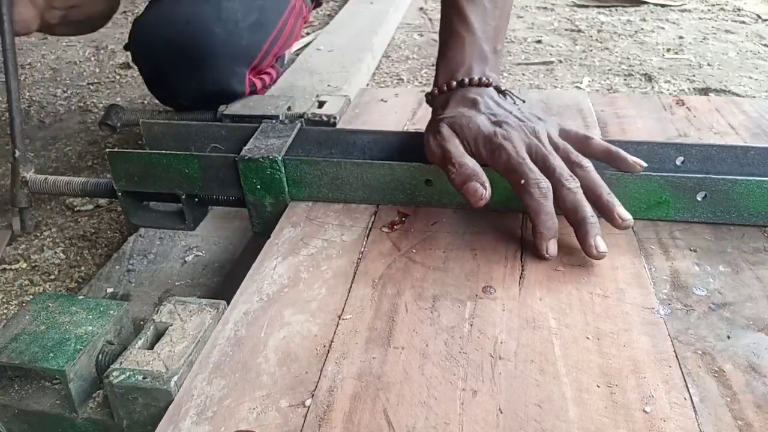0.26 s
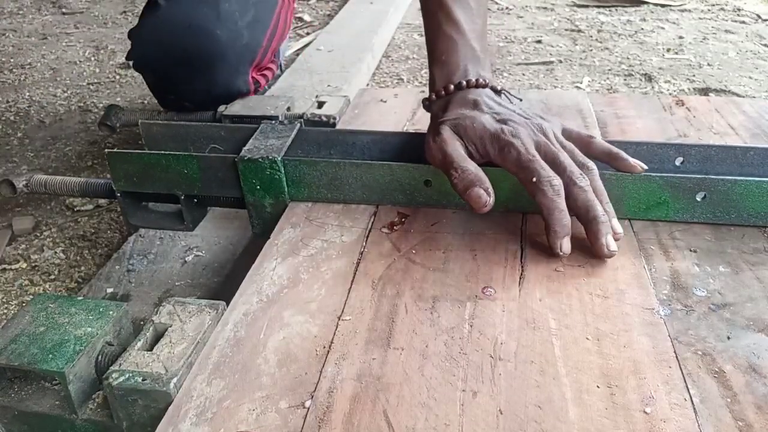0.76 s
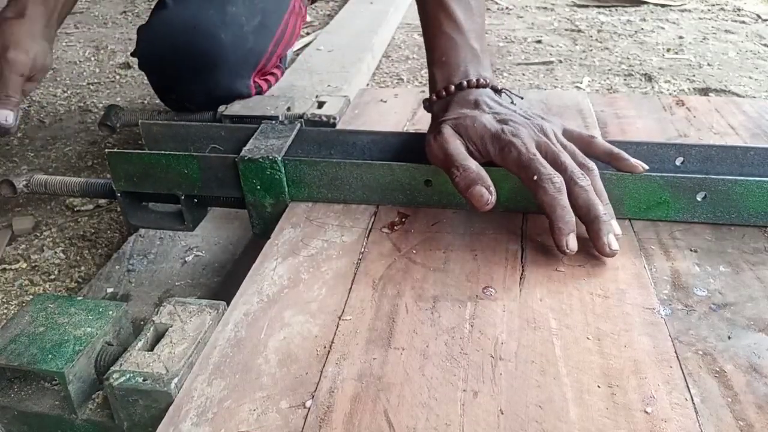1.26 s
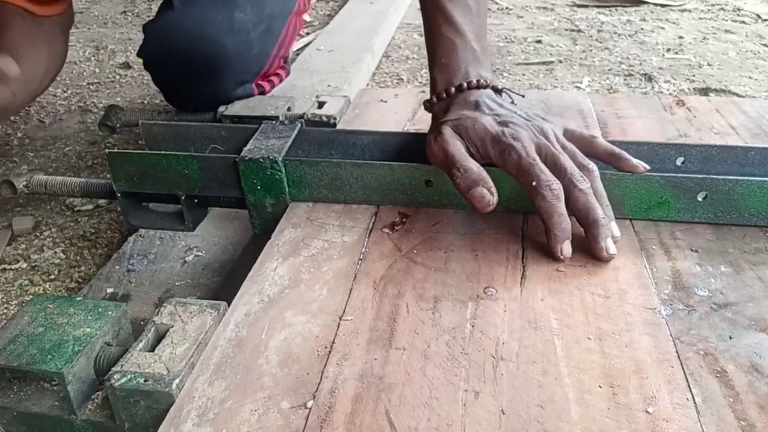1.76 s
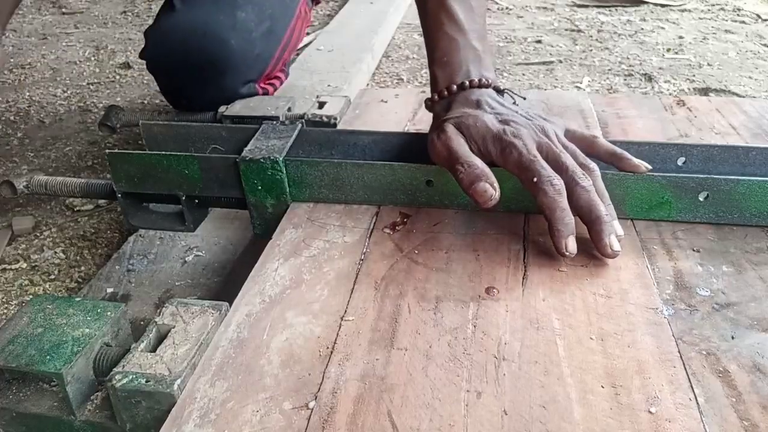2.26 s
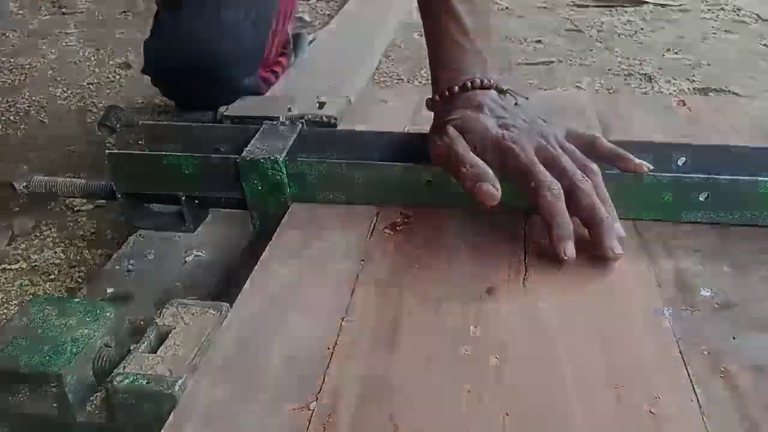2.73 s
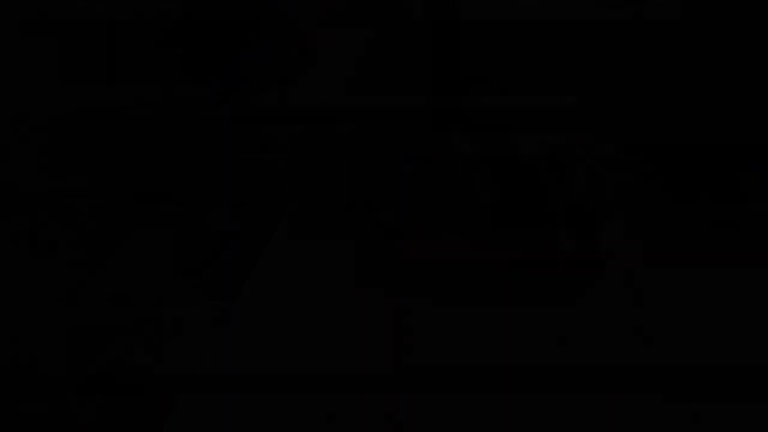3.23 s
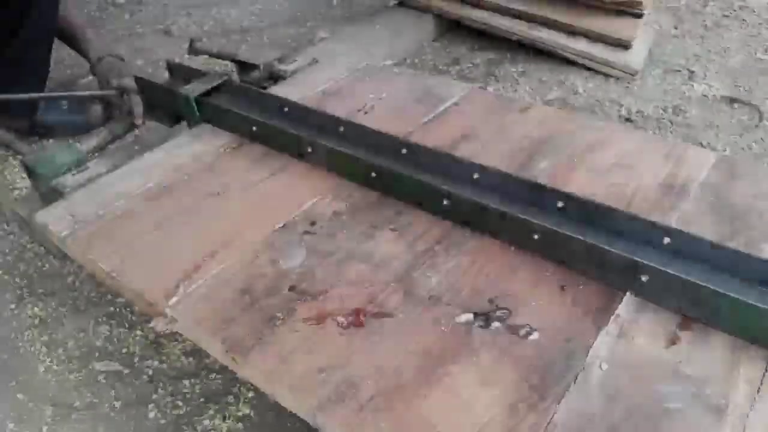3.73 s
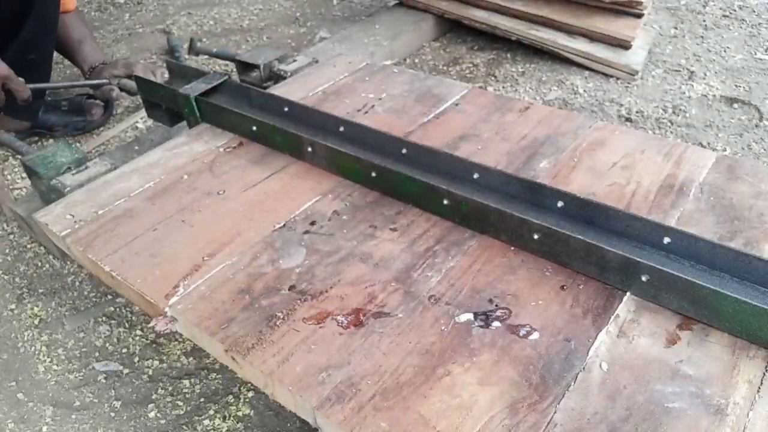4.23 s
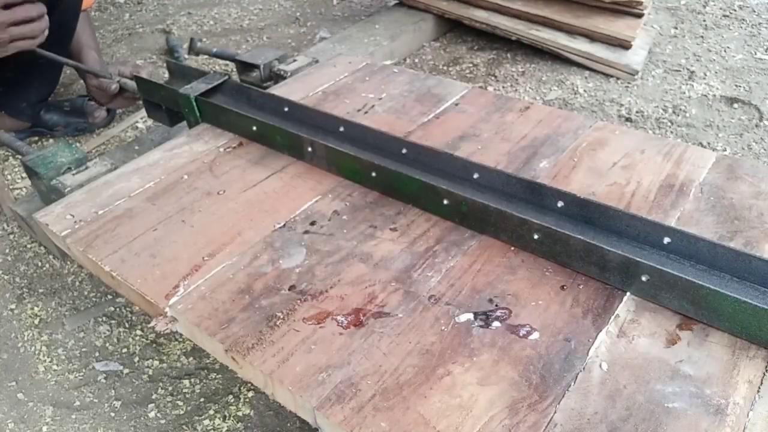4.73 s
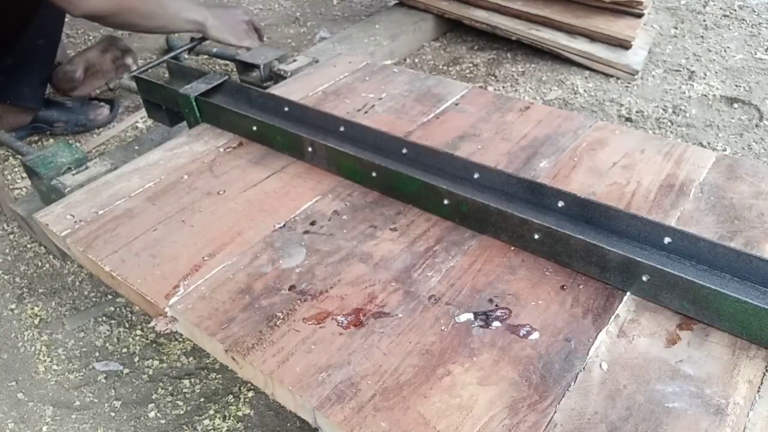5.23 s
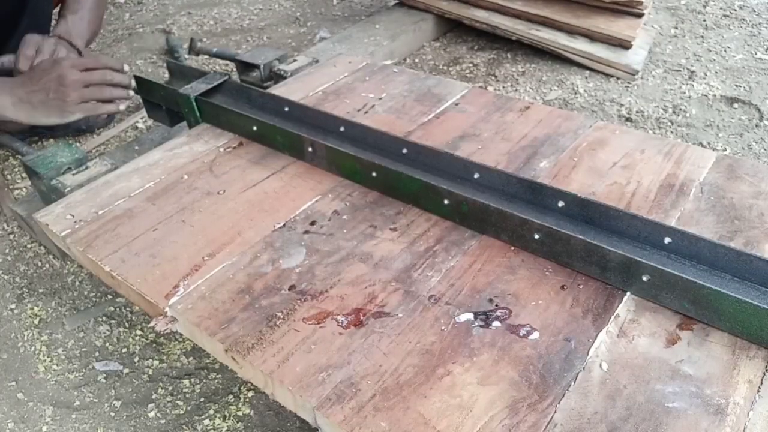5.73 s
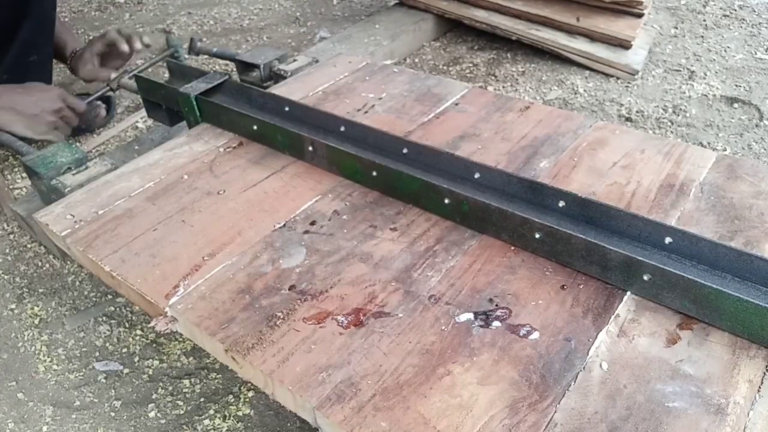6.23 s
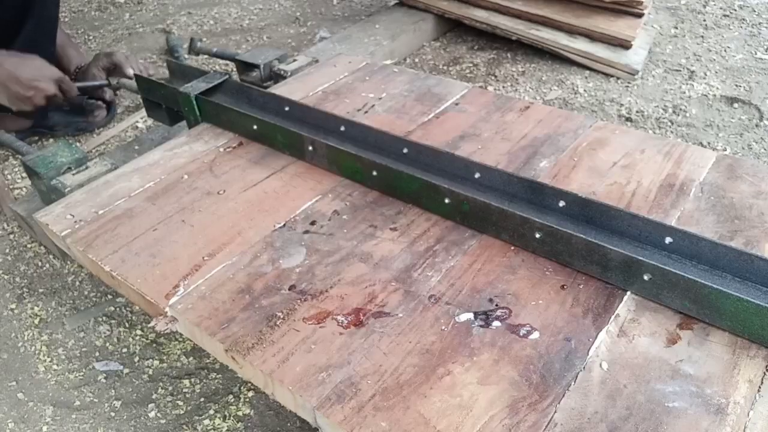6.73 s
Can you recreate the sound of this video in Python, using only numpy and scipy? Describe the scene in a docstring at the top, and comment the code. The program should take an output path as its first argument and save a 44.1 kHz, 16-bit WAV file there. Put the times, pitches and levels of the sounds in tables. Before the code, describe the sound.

In an open-air workshop a steel clamp is tightened over wooden boards. From 0 to 0.3 s, sharp bright metal clacks and a gritty scrape sound close by, then a brief gap before a hard clack at 0.63. From 0.75 to about 3.2 s the loose handle rattles irregularly, thin and dry, with short screw scrapes; stronger clacks fall near 2.1, 2.4 and 2.7, and longer grinding around 3.0-3.2. Behind is soft air and a very faint wavering hum, gone by 2.9. Sparse clicks follow as the air changes and a high throbbing cicada drone fades in from about 3 s. After 3.75 the clamp is heard from across the boards: lower, hollow knocks cluster at 4.0-4.2, then mostly air and cicadas until a faint creak near 5. From 5.2 to 7 s woody thuds, clacks and gritty turns crowd together, strongest near 5.2, 5.75 and 6.15, ending on a scraping clack.

```python
"""A steel bar clamp is screwed tight over wooden boards in an open-air workshop, from two microphone places.
Close to the screw the sliding handle clacks and rattles, thin and bright; from across the boards the wood
booms under each turn. Blows and gritty turns drive noise through resonances, and each blow rings some modes.
Behind, the open air is shaped noise: it cross-fades between the places while a throbbing cicada drone joins.
A faint far hum of wavering overtones rises and drops at the first place."""
import sys
import numpy as np
from scipy import signal
from scipy.fft import rfft, irfft, next_fast_len
from scipy.io import wavfile
from scipy.ndimage import uniform_filter1d, map_coordinates

SR = 44100
rng = np.random.default_rng(int(sys.argv[2]) if len(sys.argv) > 2 else 0)


def persist_wave(psi):
    """Save psi, clipped to +-1, as 16-bit WAV."""
    counts = np.round(np.clip(psi, -1, 1) * 32767).astype(np.int16)
    wavfile.write(sys.argv[1], SR, np.atleast_2d(counts).T)


N = 307818

# blows of the handle: (time [s], peak before lift [dB], wood re peak [dB], treble re peak [dB],
# favoured pitch [Hz])
BLOWS = [(0.0044, -23.5, -16, -10, 2720), (0.0454, -16, -33, -22, 2260), (0.0997, -39, -12, -13, 982),
         (0.1496, -48, -17, -15, 960), (0.2218, -35.5, -27, -24.5, 2070), (0.2703, -15, -27, -9.5, 3770),
         (0.6259, -15, -17, -1.5, 1290), (0.6884, -50, -13, -15, 993), (0.7602, -17.5, -41, -13, 1390),
         (0.7748, -24.5, -39, 3.5, 1430), (0.8792, -27, -33, -7, 1330), (0.8919, -24.5, -29, -5, 937),
         (0.9124, -20.5, -31, -7, 1300), (0.9389, -21.5, -31, -19, 934), (0.9644, -34.5, 5, -14.5, 918),
         (1.017, -52, -14, -12, 3600), (1.0793, -29, 2.5, -15, 910), (1.1073, -24, -32, -12, 2900),
         (1.1889, -20.5, -33, -11.5, 2430), (1.229, -28, -31, -1, 1310), (1.2509, -31, -32, -19, 2030),
         (1.3156, -32.5, -29, -9.5, 2140), (1.3627, -46.5, -4, -7, 915), (1.4494, -20.5, -1.5, -15, 2130),
         (1.5279, -46, 1.5, -15.5, 942), (1.5594, -46.5, -9.5, -9, 985), (1.5873, -18, -39, -7, 2720),
         (1.596, -18, -37, -11.5, 1290), (1.6552, -21.5, -43, -22, 2130), (1.8028, -34.5, -37, -5, 939),
         (1.93, -22.5, -0.5, -18.5, 1050), (1.9724, -51, -12, -24.5, 2130), (2.0494, -31, -28, -24, 2850),
         (2.0622, -32, -30, -16, 2830), (2.0941, -21.5, -36, -12, 2840), (2.1198, -17, -34, -6.5, 2880),
         (2.163, -38, -14, -22, 2030), (2.1897, -43, -17, -18, 2160), (2.2211, -33.5, -35, -12.5, 3010),
         (2.2488, -35.5, -30, 0, 2230), (2.3473, -30.5, -42, -6.5, 2220), (2.4098, -16.5, -34, -10, 2210),
         (2.4925, -34.5, -18, -3, 1390), (2.648, -36, 1.5, -14.5, 1060), (2.735, -14, -43, -2.5, 2130),
         (2.9043, -23.5, -33, -5.5, 2200), (2.9273, -27.5, -36, -12, 1080),
         (2.9428, -29.5, -24, -1.5, 1130), (2.9691, -24, -33, -0.5, 937), (3.0088, -27, -19, -4, 1110),
         (3.035, -24, -31, -5, 2220), (3.0644, -21, -42, -4.5, 991), (3.1094, -24.5, -32, -2.5, 1110),
         (3.1534, -33, -33, -3, 964), (3.4363, -20, -24.5, -7.5, 4620), (3.5741, -27, -37, -3, 2220),
         (3.6348, -31, -35, -17, 2240), (3.693, -44, -35, -16, 1130), (3.7697, -48, 24.5, -25, 312),
         (3.789, -35, 1, -27, 464), (3.8566, -39.5, -2, -19, 291), (3.9879, -16.5, -15, -29, 1820),
         (4.0115, -19, -10, 2.5, 312), (4.0859, -17, -31.5, -27, 476), (4.1032, -37, 11.5, -16, 455),
         (4.132, -35, 2, 4.5, 476), (4.1639, -26, -9, -7, 493), (4.2058, -25, -6, 12, 740),
         (5.0264, -59, -4, -13.5, 217), (5.0905, -48, 20, -13, 234), (5.2274, -13, -8, -6, 1270),
         (5.2529, -20.5, -9, -8, 235), (5.3567, -30, -5, -3, 517), (5.3774, -29.5, 2, -6, 318),
         (5.4484, -17.5, 9, -1, 240), (5.5893, -24.5, -14, -13, 261), (5.5974, -29, -6, 3.5, 304),
         (5.6755, -34.5, 16.5, -16, 283), (5.7538, -13.5, 3.5, -18, 263), (5.8963, -44.5, 9, 0, 240),
         (5.9907, -48.5, 28.5, -13, 250), (6.1483, -10, -9, -24, 330), (6.2033, -21, -7, -27, 275),
         (6.2332, -27, 7, -24, 312), (6.2423, -19, 5, -7, 307), (6.2827, -28.5, -7, -23, 468),
         (6.3096, -37.5, 28, -16, 312), (6.3406, -18.5, 6, -10, 307), (6.3997, -31, 11.5, -15, 382),
         (6.495, -37, -11, -20, 237), (6.5104, -35, 11, -14, 484), (6.5859, -27.5, -5.5, -19, 476),
         (6.6342, -35.5, 23, -18, 498), (6.6985, -29, 8, -8.5, 514), (6.7574, -37, 9, -10, 248),
         (6.847, -36.5, -6, -21, 218), (6.8844, -38, -20, -16, 423), (6.8994, -29, -16, -15, 430),
         (6.9488, -26.5, -20, -11, 1940)]
# turns of the screw grinding in its nut: (start [s], length [s], first level [dB], last level [dB],
# wood re level [dB], lower steel re level [dB], treble re level [dB])
TURNS = [(0.0, 0.037, -26.5, -29.5, -23, -6.5, -8), (0.046, 0.006, -23, -23.5, -20, -1.5, -7.5),
         (0.4, .038, -78, -62.5, -11, -8, 7.5), (0.438, 0.056, -60, -58, -17, -7, 2),
         (0.748, 0.014, -65, -38, -12, -.3, -14), (0.76, 0.013, -23, -31.5, -22, -6.5, -10),
         (0.882, 0.04, -33, -41, -34, 5.5, 1.5), (0.94, 0.028, -26, -36.5, -20, -1, -7),
         (1.08, .012, -42, -51, 5, 9, -27), (1.1, 0.0072, -40, -38.5, -10, 0, -19),
         (1.172, .014, -61, -48, -15, 3, -4.5), (1.186, 0.085, -34, -32, -19.5, -1.5, -7),
         (1.314, 0.033, -63, -73, -6, 0, -11), (1.555, .03, -67, -51, -13.5, -3.5, -7),
         (1.588, 0.067, -23, -35, -26, -3, -4.5), (1.72, 0.0635, -63.5, -65.5, -12, -9, -13.5),
         (1.978, 0.074, -51.5, -66, -3, 2, -14), (2.03, .02, -57, -45.5, -13.5, -3, -10.5),
         (2.05, 0.064, -42.5, -24, -23, -4.5, -6), (2.225, 0.019, -78, -41, -11.5, 4, -20),
         (2.35, 0.054, -42.5, -52, -27, -1.5, -19), (2.392, 0.014, -53.5, -34, -33.5, 0, -14),
         (2.41, 0.029, -24.5, -26, -25, -5, -8.5), (2.722, 0.0094, -54, -37, -21, 2.5, -7.5),
         (2.733, 0.012, -31.5, -23.5, -29, -4.5, -8), (2.897, 0.074, -32, -59, -24, 2, -2),
         (2.97, 0.12, -44, -33.5, -30, 0, -8), (3.09, 0.14, -45.5, -37.5, -22.5, -0.5, -3),
         (3.44, 0.02, -52, -47.5, -21, -3, -3), (3.53, .02, -74, -50, -25, -1, -7.5),
         (3.55, 0.1, -47, -40.5, -31, -.7, -3.5), (3.688, .014, -44, -38.5, -42, 0, -2.5),
         (3.772, 0.028, -55.5, -51.5, 21, 12.5, -25), (3.856, 0.027, -54, -58.5, 18.5, 11.5, -10),
         (3.99, 0.094, -32, -36.5, 0.5, 3.5, -9), (4.08, .12, -35.5, -41, 8, 4.5, -15),
         (4.206, 0.0079, -32, -36, 6.5, 4, -4), (4.93, .28, -73.5, -60, 9.5, 0, 0),
         (5.23, 0.043, -33.5, -36, -2.5, -.3, -8.5), (5.344, 0.0095, -52, -43.5, 13, 8, -10),
         (5.356, 0.049, -38, -38, 14.5, 5, -12), (5.448, 0.048, -37.5, -38.5, 10.5, 3.5, -9),
         (5.506, 0.089, -41, -32.5, 10, 6.5, -15), (5.742, 0.0081, -56, -30.5, 3, -1.5, -17),
         (5.755, 0.024, -22.5, -48, -2, -3, -9), (5.9, 0.026, -72, -52.5, 14.5, 8.5, -6),
         (5.932, 0.2, -60, -81, 24, 9.5, -8), (6.15, 0.016, -25.5, -34.5, -3, -7, -6.5),
         (6.18, 0.032, -39, -24, 3.5, 3, -16.5), (6.23, 0.049, -23, -39, 7, -1.5, -8),
         (6.28, .078, -39.5, -33, 6.5, 3, -9.5), (6.39, 0.055, -44, -54, 5, 4, -16),
         (6.485, 0.021, -58.5, -38, 13, 5, -9.5), (6.514, 0.063, -38.5, -41.5, 14, 7.5, -13.5),
         (6.695, 0.12, -51, -57, 14.5, 6, -13), (6.81, .065, -58, -54, 10.5, 3, -14),
         (6.878, 0.027, -41.5, -43, -3, -11, -16), (6.928, 0.021, -48.5, -26.5, -2, -0.5, -10),
         (6.951, 0.032, -26, -23, -10, -5.5, -2.5)]
# broad colour of clamp and boards at each place: (frequency [Hz], relative density [dB per Hz])
NEAR_COLOUR = [(59, -84), (100, -38), (681, -18.5), (958, -1.5), (1440, -4.5), (2200, -7.5), (2400, -9.5),
               (3670, -15.5), (4840, -7), (5870, -21), (8430, -15), (14700, -31), (16300, -40)]
FAR_COLOUR = [(24, -64), (40, -39), (306, -1.5), (358, -6.5), (458, -3), (613, -9.5), (1310, -9.5),
              (1530, -20.5), (1920, -13.5), (4300, -29), (5740, -33.5), (7510, -26.5), (8100, -35),
              (8500, -27.5), (12000, -44.5), (14500, -45), (16000, -75.5)]
# resonances of clamp and boards at each place: (frequency [Hz], width [Hz], lift [dB])
NEAR_MODES = [(350, 130, 11.5), (524, 130, 9.5), (955, 59, 3), (1064, 54, 5), (1287, 84, 9), (1694, 180, 5),
              (2177, 110, 10), (2887, 220, 10.5), (3230, 130, 7.5), (3500, 110, 2.5), (4330, 32, -8),
              (4840, 91, 2), (8340, 520, -1), (13700, 320, 13)]
FAR_MODES = [(235.7, 26, 7.9), (320, 32, 2.43), (470.6, 13, 3.85), (540, 50, 1.5), (662, 30, 2.8),
             (982, 29, 3.4), (1200, 110, 1.9), (1937, 95, 2.4), (2470, 84, 3.4), (3160, 50, 5.3),
             (4000, 40, 2.6), (6340, 96, 6.6), (6670, 160, 12.5), (7400, 230, 11)]
# likeness of the left and right channels at each place: (frequency [Hz], likeness [-1 to 1])
NEAR_ALIKE = [(60, 0.8), (120, 0.76), (240, 0.81), (480, 0.95), (950, 0.83), (1890, 0.84), (3770, 0.33),
              (7520, 0.4), (15000, 0.15)]
FAR_ALIKE = [(60, 0.82), (120, 0.94), (240, 0.96), (480, 0.83), (950, 0.18), (1890, 0.34), (3770, -0.2),
             (7520, 0.93), (15000, -0.04)]
# gaps in the treble heard from the far place: (frequency [Hz], gain [dB])
TREBLE_GAPS = [(5150, 3), (5300, -7), (5650, -1), (5800, 3), (8300, 2.5), (8900, -29.5), (11300, -53.5),
               (11700, -3)]
# pings of the loose handle: (time [s], peak before lift [dB], favoured pitch [Hz])
PINGS = [(1.282, -51, 3605.5), (3.452, -56, 3200)]
# resonances of the loose handle: (frequency [Hz], width [Hz], lift [dB])
HANDLE_MODES = [(3200, 16, 0), (3600, 26, 0)]
# cross-fade of the surroundings: (time [s], near air level [dB], far air level [dB], cicada level [dB])
FADE = [(0, -58, -100, -100), (1.5, -61, -100, -100), (2.8, -62, -92.5, -85), (3.25, -65.5, -73, -68),
        (3.7, -73, -65.5, -61), (3.8, -100, -61, -58), (4.6, -100, -61.5, -56), (5.5, -100, -56.5, -56.5),
        (7, -100, -59, -57)]
# spectrum of the open air at each place: (frequency [Hz], relative density [dB per Hz])
NEAR_AIR = [(24, -71), (40, -31.5), (124, -34), (483, -8), (669, -7), (759, -11.5), (1050, -11),
            (1500, -22.5), (2180, -21), (3350, -23), (3800, -26.5), (4200, -25), (7490, -35.5),
            (14400, -27), (16300, -29)]
FAR_AIR = [(15, -45.5), (25, -13), (120, 0.9), (489, -9), (1470, -22), (1940, -22.5), (2790, -27.5),
           (4000, -22), (6700, -22.5), (8500, -27), (12000, -30.5), (14000, -26), (16000, -51.5)]
# spectrum of the cicada chorus: (frequency [Hz], relative density [dB per Hz])
CICADAS = [(2500, -64), (4250, -18), (4300, -27), (4330, -3.5), (4850, 8.5), (5070, 1.5), (5240, -13.5),
           (5300, -27), (6890, -41.5), (11700, -120)]
# course of the far hum: (time [s], pitch [Hz], level [dB])
HUM = [(.1, 173, -85), (.3, 174, -67), (.6, 177, -72), (.8, 181, -72), (1.4, 184, -73), (1.5, 164, -76),
       (1.8, 164, -69), (2.4, 163, -75), (2.9, 164, -85)]
# overtones of the far hum: (multiple of the pitch, level re hum [dB])
HUM_TONES = [(2, -14), (3, -1.5), (4, 3), (5, -3), (6, -12)]

CUT_S = 3.75  # blows and turns after this are heard from the far place
LOWER_DB_PER_OCTAVE = -4.5  # the lower steel range weakens as a blow favours modes above 1 kHz
BITE_DB_PER_S = 15000  # how fast a turn sets in
TOP_HZ = 16489  # band limit of the recorder


def near_clamp():
    """The clamp from beside the screw: the steel is bright and the left channel slightly stronger."""
    force = contact(False, lift_db=-9.5, crack_db=8.0, grit_db=2.0, lives=[.04, .042, .052, .065],
                    rise=0.001, lower_db=1.1, release=[900, 700, 900, 900])
    noisy = clamp(force, lambda hz: along(NEAR_COLOUR, hz), NEAR_MODES, NEAR_ALIKE,
                  edges_hz=[650, 1700, 5000], same=0.31, lead=1.4, patchy_db=5,
                  drive_db=[0.095, 0.11, 0.1, 0.17])
    rings = ringing(at_place(BLOWS, False), NEAR_MODES, ring_db=-9, reach_db=22.5, linger=1.0)
    return amp([[.6], [-.6]]) * (noisy + rings)


def far_clamp():
    """The clamp from across the boards: the wood booms and its modes ring longer for their width."""
    force = contact(True, lift_db=-8.0, crack_db=-2.0, grit_db=1.2, lives=[0.038, 0.086, .08, .043],
                    rise=0.0008, lower_db=-0.1, release=[403, 308, 360, 375])
    noisy = clamp(force, lambda hz: along(FAR_COLOUR, hz) + along(TREBLE_GAPS, hz), FAR_MODES, FAR_ALIKE,
                  edges_hz=[600, 1500, 5300], same=0.29, lead=0, patchy_db=4.5,
                  drive_db=[0.5, 0.075, 0.092, 1.7])
    rings = ringing(at_place(BLOWS, True), FAR_MODES, ring_db=-13.5, reach_db=24.0, linger=3.04)
    return amp([[.3], [-.3]]) * (noisy + rings)


def contact(late, lift_db, crack_db, grit_db, lives, rise, lower_db, release):
    """Force envelopes at one place for upper steel, wood, lower steel and treble: blows plus gritty turns.
    lives: t60 [s] of a blow in each range; rise: onset time constant [s];
    release: how fast each range dies after a turn [dB per s]."""
    force, t = np.zeros((4, N + SR)), np.arange(SR // 5) / SR
    for start, db, wood_db, treble_db, favoured_hz in at_place(BLOWS, late):
        octaves = np.log2(max(favoured_hz / 1000, 1))
        parts_db = np.array([0, wood_db, lower_db + LOWER_DB_PER_OCTAVE * octaves, treble_db])
        body_fall = amp(-60 * t / np.array(lives)[:, None])
        crack = amp(crack_db - 60 * t / 0.013)  # the first instant of metal on metal
        fall = (body_fall + crack) * (1 - np.exp(-t / rise))
        force[:, round(start * SR):][:, :len(t)] += amp(db + lift_db + parts_db[:, None]) * fall

    grit = amp(grit_db * (wobble(500) + 1.1 * wobble(90)))  # thread burrs catch and let go
    grit /= np.sqrt(np.mean(grit ** 2))
    for start, length, first_db, last_db, *parts_db in at_place(TURNS, late):
        first = max(0, round(start * SR) - SR // 20)
        last = min(N, round((start + length) * SR) + SR // 4)
        n = np.arange(first, last)
        since = n / SR - start
        level_db = np.interp(since, [0, length], [first_db, last_db])
        level_db = level_db + BITE_DB_PER_S * np.minimum(since, 0)
        level_db = level_db - np.outer(release, np.maximum(since - length, 0))
        grinding = amp(level_db + np.array([0, *parts_db])[:, None]) * grit[n]
        force[:, n] = np.hypot(force[:, n], grinding)
    return force[:, :N]


def clamp(force, colour, modes, alike, edges_hz, same, lead, patchy_db, drive_db):
    """Each force drives noise through its own range of the resonant clamp and boards.
    same: share of the side noise power that is an echo of the direct noise."""
    def body(hz):
        resonances = sum(db / (1 + (2 * (hz - centre) / width) ** 2) for centre, width, db in modes)
        return amp(colour(hz) + resonances)

    def above(hz, edge):
        return 1 / np.sqrt(1 + (edge / (hz + 1)) ** 8)

    def below(hz, edge):
        return np.sqrt(1 - above(hz, edge) ** 2)

    wood, lower, upper = edges_hz
    ranges = (lambda hz: body(hz) * above(hz, lower) * below(hz, upper),  # upper steel
              lambda hz: body(hz) * below(hz, wood),
              lambda hz: body(hz) * above(hz, wood) * below(hz, lower),  # lower steel
              lambda hz: body(hz) * above(hz, upper))  # treble
    direct, scattered = shifting(patchy_db)
    # several ms of reflections off boards and ground
    bounce = rng.standard_normal(600) * amp(-np.arange(600) * 0.036)
    echo = signal.fftconvolve(direct, bounce / np.linalg.norm(bounce))[:N]
    share = np.clip(same, 0, 1)
    side = np.sqrt(share) * echo + np.sqrt(1 - share) * scattered
    noise = np.array([direct, side])
    driven = amp(drive_db)[:, None, None] * force[:, None] * noise
    return heard(driven, ranges, alike, lead)


def shifting(patchy_db):
    """Two noises whose colour shifts in patches as the point of contact wanders."""
    z = signal.stft(rng.standard_normal((2, N)), nperseg=512)[2]
    field = uniform_filter1d(rng.standard_normal(z.shape[1:]), size=3, axis=0)
    field = uniform_filter1d(field, size=6, axis=1)
    depth = np.minimum(np.arange(len(field)) / 25, 1)[:, None]  # the boards' low tones shift least
    patches = amp(patchy_db * depth * field / field.std())
    noise = signal.istft(z * patches, nperseg=512)[1][:, :N]
    return noise / noise.std()


def ringing(blows, modes, ring_db, reach_db, linger):
    """Each blow rings the modes nearest the pitch that its point of contact favours.
    reach_db: loss per octave away from that pitch; linger: stretch of the decay that a mode's width sets."""
    out, t = np.zeros((2, N + SR)), np.arange(SR // 8) / SR
    hz, width, lift_db = np.transpose(modes)[:, :, None]
    chances = rng.standard_normal((len(blows), 3, len(modes), 1))
    for (start, db, *_, favoured_hz), chance in zip(blows, chances):
        mode_db = db + ring_db + 0.65 * lift_db - reach_db * abs(np.log2(hz / favoured_hz))
        gain = amp(mode_db + 3.1 * chance[0] - 27 * width * t / linger)
        for channel in range(2):  # higher modes reach the two channels with more unlike phase
            phase = 2 * np.pi * hz * t + chance[1 + channel] * np.minimum(hz / 3300, 2)
            tones = np.sum(gain * np.sin(phase), axis=0)
            out[channel, round(start * SR):][:len(t)] += tones * np.minimum(t / 0.0019, 1)
    return out[:, :N]


def at_place(rows, late):
    """The rows heard from the near place, or from the far place if late."""
    return [row for row in rows if (row[0] > CUT_S) == late]


def handle():
    """Two faint pings of the free steel handle, ringing in its narrow modes."""
    return ringing(PINGS, HANDLE_MODES, ring_db=8, reach_db=150, linger=0.97)


def outdoors():
    """The air at both places and the cicada chorus, which throbs unevenly, all as shaped noise."""
    near_db, far_db, chorus_db = curves(FADE)
    near = amp(near_db + 1.74 * wobble(4.0)) * rush(NEAR_ALIKE, NEAR_AIR)
    far = amp(far_db + 1.3 * wobble(4.53)) * rush(FAR_ALIKE, FAR_AIR, TREBLE_GAPS)
    throb_db = 1.5 * wobble(30) + 0.57 * wobble(5.9)
    balance_db = np.array([[.6], [-.6]])
    chorus = amp(chorus_db + throb_db + balance_db) * rush([(4800, 0.17)], CICADAS, TREBLE_GAPS)
    return near + far + chorus


def rush(alike, *spectra):
    """Steady stereo noise whose spectrum is the sum of the given dB curves."""
    def gain(hz):
        return amp(sum(along(part, hz) for part in spectra))
    return heard([rng.standard_normal((2, N))], [gain], alike)


def hum():
    """A few overtones of a wavering far tone, alike in both channels."""
    hz, db = curves(HUM)
    cycles = np.cumsum(hz * (1 + .006 * wobble(30))) / SR
    tones = sum(amp(level_db + 3 * wobble(14)) * np.sin(2 * np.pi * multiple * cycles)
                for multiple, level_db in HUM_TONES)
    return amp(db) * tones * (np.arange(N) < HUM[-1][0] * SR)


def heard(pairs, gains, alike, lead=0):
    """Mid and side noises, coloured by their gains, mixed to left and right; left leads by lead samples."""
    m = next_fast_len(N + 16384)
    hz = np.fft.rfftfreq(m, 1 / SR)
    angle = np.arccos(np.clip(along(alike, hz), -.5, 1)) / 2  # the less alike, the more side
    coloured = sum(rfft(pair, m) * rfft(causal(gain), m) for pair, gain in zip(pairs, gains))
    mid, side = coloured * [np.ones_like(angle), np.tan(angle)]
    shift = np.exp(1j * np.pi * hz * lead / SR)
    return irfft([(mid + side) * shift, (mid - side) / shift], m)[:, :N]


def causal(gain):
    """The minimum-phase impulse response of unit energy for a gain curve of frequency."""
    g = gain(np.fft.rfftfreq(16384, 1 / SR))
    cepstrum = irfft(np.log(np.maximum(g / np.sqrt(np.mean(g ** 2)), 1e-6)))
    cepstrum[1:len(g) - 1] *= 2  # fold the negative times onto the positive
    cepstrum[len(g):] = 0
    return irfft(np.exp(rfft(cepstrum)))


def amp(db):
    """Amplitude of a level in dB."""
    return 10 ** (np.asarray(db) / 20)


def along(points, hz):
    """(frequency [Hz], value) points read on a log frequency axis."""
    f, v = np.transpose(points)
    return np.interp(np.log(hz + 1), np.log(f + 1), v)


def curves(rows):
    """One value per sample for each column after the time."""
    times, *columns = np.transpose(rows)
    return [np.interp(np.arange(N) / SR, times, column) for column in columns]


def wobble(rate):
    """A smooth random curve, rate knots a second."""
    knots = rng.standard_normal(int(N * rate / SR) + 4)
    return map_coordinates(knots, [np.arange(N) * rate / SR])


def scene():
    """The clamp from both places, with its handle and surroundings."""
    return near_clamp() + far_clamp() + handle() + outdoors() + hum()


def record(dry):
    """The loudest peaks saturate softly; the recorder keeps nothing above its band limit."""
    held = dry / (1 + abs(dry / .45) ** 4) ** (1 / 4)
    return irfft(rfft(held) * (np.fft.rfftfreq(N, 1 / SR) < TOP_HZ), N)


dry = scene()
out = record(dry)
persist_wave(out)
```